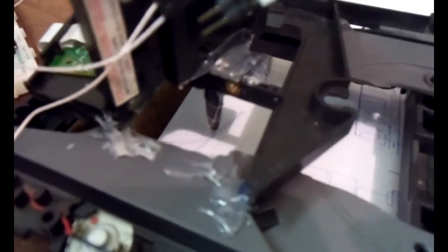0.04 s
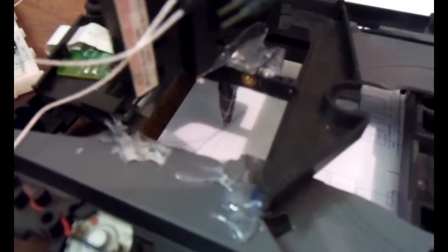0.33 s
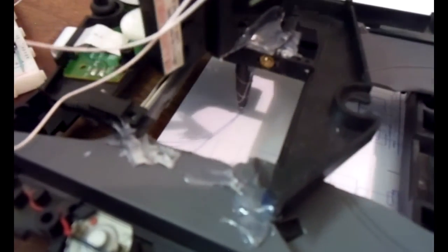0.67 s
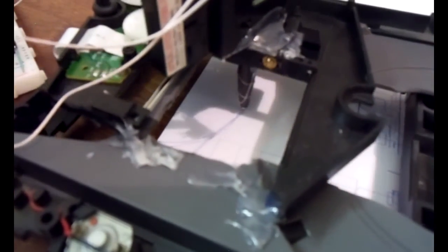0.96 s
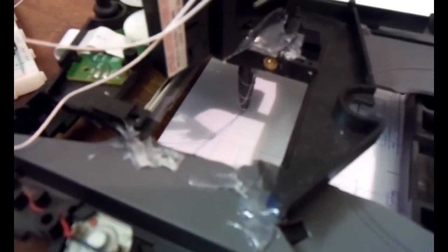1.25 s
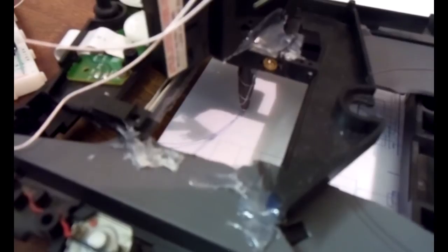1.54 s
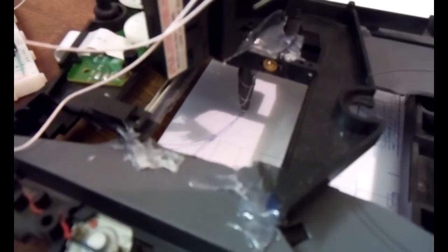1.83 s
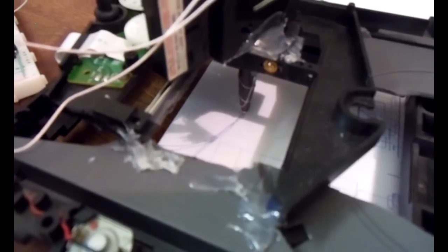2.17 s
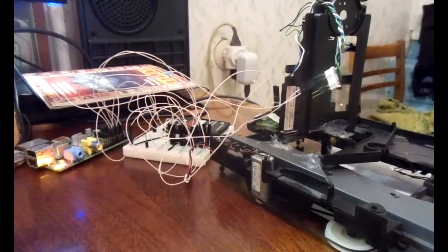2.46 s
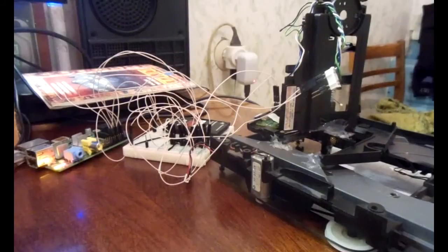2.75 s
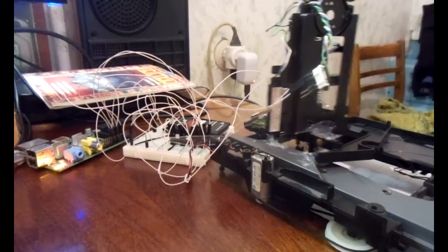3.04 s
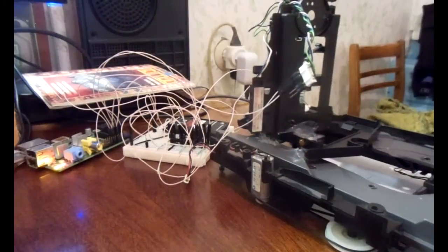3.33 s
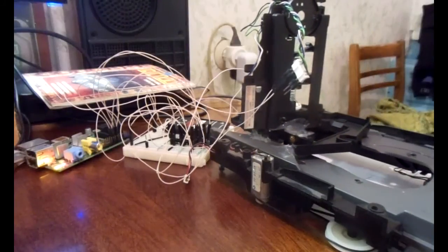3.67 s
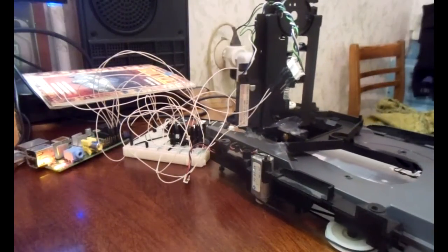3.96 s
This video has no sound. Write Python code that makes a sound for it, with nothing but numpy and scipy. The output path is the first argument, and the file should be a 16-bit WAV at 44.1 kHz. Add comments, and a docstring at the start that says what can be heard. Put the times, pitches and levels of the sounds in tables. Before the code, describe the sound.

A pen plotter's small motor drags its carriage in quick rubbing strokes with knocks and ticks, fading by 1.4 seconds. A plastic click comes at 2 seconds, then a brief silence. A computer fan's hum and a faint high whine return slightly louder. From 3 seconds a slide scrapes with sharp plastic clacks, loudest around 3.2 to 3.3, and a thin, wavering hiss continues until 4 seconds.

```python
"""A homemade pen plotter's small motor drags its carriage in quick, short strokes.
The strokes rub, knock and tick, then die away. After a brief silence, heard from another spot,
a motor runs a slide into its stop with a few plastic clacks and whirrs on with a thin, wavering hiss.
Behind the plotter, its electronics whine and a computer fan hums."""
import sys
import numpy as np
from scipy import signal
from scipy.fft import rfft, irfft
from scipy.io import wavfile

SR = 44100
rng = np.random.default_rng(int(sys.argv[2]) if len(sys.argv) > 2 else 0)


def to_wav(sig):
    """Store sig (one row per channel, or 1-D mono) as 16-bit WAV at the path in sys.argv[1].

    Samples outside -1..1 are clipped; the rate is SR.
    """
    pcm = np.clip(np.atleast_2d(sig), -1, 1) * 32767
    pcm = np.round(pcm).astype(np.int16)
    wavfile.write(sys.argv[1], SR, pcm.T)  # frames by channels


N = 176400
T = np.arange(N) / SR
PAUSE_S, RESUME_S = 2.108, 2.26  # start and end of the silence
TOP_HZ = 14300  # the sound fades out above this pitch


def carriage():
    """Each motor step drags the carriage a little, so it rubs; loose frame parts buzz underneath."""
    # one stroke per motor step (start [s], length [s], level [dB])
    strokes = [(-.015, 0.03, -49), (0.025, 0.047, -48), (0.086, 0.043, -50), (0.149, 0.048, -48),
               (0.203, 0.048, -47.5), (0.267, 0.046, -48), (0.314, 0.051, -50), (0.368, 0.046, -49),
               (0.44, 0.02, -45), (0.48, 0.035, -46), (0.524, 0.031, -50), (0.597, 0.016, -41),
               (0.643, 0.027, -52)]
    # tone of the rubbing (frequency [Hz], level [dB])
    rub_tone = [(300, -12), (1600, 1), (2600, 1), (4900, -1), (6300, -7), (7050, 9), (7700, -4), (9600, -2),
                (12300, -3), (12950, 4), (13400, 0), (14200, 1)]
    # how loud the loose parts buzz (time [s], level [dB])
    buzz_levels = [(0, -53.5), (.27, -61.5), (.36, -50), (.56, -52), (.95, -57.5), (1.4, -65.5)]
    # tone of the buzz (frequency [Hz], level [dB])
    buzz_tone = [(150, -10.5), (400, 11.5), (2000, -2), (4000, -2), (7000, -11), (14000, -6.5)]
    fade_s = .007
    moving = sum(amp(db) * np.clip(np.minimum(T - start, start + length - T) / fade_s, 0, 1)
                 for start, length, db in strokes)
    rub = colour(friction(per_s=12000, spread_db=-0.5) * moving, rub_tone)
    buzz = colour(friction(per_s=2200, spread_db=-2.5) * level(buzz_levels), buzz_tone)
    return rub + buzz


def knocks_and_ticks():
    """The carriage lurches with a thud, motor steps knock the frame and slack gears tick as they catch."""
    # heavy lurches (time [s], level [dB])
    thuds = [(.037, -40.5), (.159, -41), (.212, -42), (.3327, -35.5), (.3854, -34), (.4387, -37),
             (.5461, -34)]
    # lighter knocks of the motor steps (time [s], level [dB])
    knocks = [(0.065, -42.5), (0.125, -43), (0.184, -38), (0.355, -43.5), (0.408, -45), (0.4917, -46),
              (0.561, -35.5), (0.566, -43), (0.6217, -39), (0.6885, -41), (.711, -49), (.812, -46),
              (0.8597, -43.5), (0.9033, -42), (0.9682, -46.5), (1.0272, -44.5), (1.081, -45),
              (1.1331, -44.5), (1.1799, -44.5), (1.2273, -45), (1.3028, -45), (1.312, -49.5)]
    # tone of the knocked frame (frequency [Hz], level [dB])
    knock_tone = [(200, -12), (700, -6), (1150, -10), (1750, 2), (2000, 0), (2400, 4), (3300, -7),
                  (3900, -4), (4700, -3), (5900, -16), (7150, -7), (8300, -22), (14000, -26)]
    # sharp gear ticks (time [s], level [dB])
    ticks = [(0.0074, -35.5), (0.249, -37.5), (0.3, -39), (0.319, -37), (0.354, -41), (0.4077, -38.5),
             (0.4627, -36), (0.4905, -39.5), (0.5623, -28), (0.619, -33.5), (0.623, -32.5), (0.667, -43),
             (0.7196, -41.5), (0.7713, -37.5), (0.82, -40), (0.8702, -40), (0.929, -39), (0.978, -41),
             (1.034, -44.5), (1.089, -47), (1.3026, -44), (1.961, -46.5)]
    # tone of a tick (frequency [Hz], level [dB])
    tick_tone = [(300, -28), (1200, -9.5), (2400, 1), (4600, 4), (7800, 1.5), (9500, 2), (10600, -0.5),
                 (11600, 8), (12600, -0.5), (14000, 2)]
    out = np.zeros((2, N))
    for start, db in thuds:
        thud = blow(attack_s=.0012, decay_s=.0045, tail_db=-25, tail_s=.03)
        add(out, start, amp(db) * colour(thud, knock_tone, ring=(800, 450, 8)))  # the frame's low ring
    for start, db in knocks:
        knock = blow(attack_s=.0012, decay_s=.0025, tail_db=-24, tail_s=.025)
        add(out, start, amp(db) * colour(knock, knock_tone))
    for start, db in ticks:
        tick = blow(attack_s=.0021, decay_s=.00096, tail_db=-17.5, tail_s=.0035)
        add(out, start, amp(db) * colour(tick, tick_tone))
    return out


def slide():
    """The running slide scrapes, while its hiss and a high singing sound swell in turn."""
    # how loud the slide scrapes (time [s], level [dB])
    scrape_levels = [(2.985, -71), (3.01, -44.5), (3.06, -47), (3.12, -41), (3.185, -40), (3.275, -47),
                     (3.3, -32.5), (3.335, -38), (3.37, -52.5), (3.45, -54), (4, -53)]
    # tone of the scrape (frequency [Hz], level [dB])
    scrape_tone = [(300, -0.5), (1000, -6.5), (2300, -0.5), (3100, -1), (3700, 4), (4300, -5.5),
                   (5000, 1.5), (5600, -5.5), (9300, -10.5), (11000, -5), (14000, -1.5)]
    # how loud it hisses (time [s], level [dB])
    hiss_levels = [(3, -55), (3.1, -42.5), (3.17, -37.5), (3.26, -40), (3.33, -41), (3.48, -43.5),
                   (3.8, -46.5), (4, -49.5)]
    # tone of the hiss (frequency [Hz], level [dB])
    hiss_tone = [(5000, -32.5), (8600, -10), (9250, -6), (9800, -8), (10350, -2), (11000, -6), (11900, -3),
                 (12300, -7), (12800, 2), (13400, 2.5), (14300, -10)]
    # how loud it sings near 7.5 kHz (time [s], level [dB])
    sing_levels = [(3.05, -49), (3.3, -53.5), (4, -53.5)]
    # tone of the singing (frequency [Hz], level [dB])
    sing_tone = [(5000, -45), (6300, -7), (6900, 7), (7350, -4), (7750, 5.5), (8300, -30), (10000, -54.5)]
    period_s, peak_s = .222, 3.58
    swing = np.cos(2 * np.pi * (T - peak_s) / period_s)
    scrape = friction(per_s=12000, spread_db=4.5) * level(scrape_levels)
    hiss = friction(per_s=13000, spread_db=3) * level(hiss_levels) * amp(2.5 * swing)
    sing = rng.standard_normal((2, N)) * level(sing_levels) * amp(-1.5 * swing)
    return colour(scrape, scrape_tone) + colour(hiss, hiss_tone) + colour(sing, sing_tone)


def clacks():
    """Plastic parts catch and strike their stops, each with its own ring and low thud."""
    # hits (time [s], level [dB], decay [s], ring pitch [Hz], ring width [Hz], ring [dB], thud [dB])
    hits = [(2.0065, -27, 0.0022, 600, 300, 12.5, 4), (3.003, -37, 0.0047, 2640, 1500, 6, 3.5),
            (3.023, -29, 0.0024, 8200, 900, 16, 14), (3.047, -32.5, 0.0029, 8800, 1500, 15, 7),
            (3.088, -32.5, .002, 9200, 1200, 13, 0), (3.155, -31, .002, 11000, 1500, 2, -5),
            (3.1747, -12, 0.00089, 9550, 710, 13, -6), (3.1763, -24.5, 0.0017, 2880, 1000, 9, -10),
            (3.282, -14.5, 0.0025, 5100, 2500, 5, 3.5), (3.291, -28.5, 0.0056, 2300, 1800, 14, 9),
            (3.317, -21, 0.0034, 1890, 1090, 24.5, 18)]
    # tone of struck plastic (frequency [Hz], level [dB])
    plastic_tone = [(150, -22.5), (600, -6), (900, -10), (1600, -5), (2400, -1), (3000, -2), (3700, 2),
                    (4400, -1), (5100, 0.5), (6800, -3.5), (9400, 0), (11000, -3), (14000, -5.5)]
    # how alike left and right are (frequency [Hz], likeness [0-1])
    likeness = [(9000, .6)]
    thud_below_hz, crack_s = 1330, .0002
    out = np.zeros((2, N))
    for start, db, decay_s, ring_hz, width_hz, ring_db, thud_db in hits:
        tone = [(hz, band_db + thud_db / (1 + (hz / thud_below_hz) ** 4)) for hz, band_db in plastic_tone]
        hit = blow(attack_s=.00012, decay_s=decay_s, tail_db=-27.5, tail_s=.052)
        hit[0, round(crack_s * SR)] = amp(10)  # the first contact stands out from the chatter
        add(out, start, amp(db) * colour(hit, tone, likeness, ring=(ring_hz, width_hz, ring_db)))
    return out


def frame(sound):
    """The hollow plastic frame adds a brief ring made of many close pitches."""
    decay_s = .009
    t = np.arange(2 ** 11) / SR
    noise = rng.standard_normal((3, len(t))) * np.exp(-t / decay_s)
    echoes = noise[:2] * 0.45 + noise[2]  # mostly shared by left and right
    ring = amp(-7) * echoes / np.linalg.norm(echoes, axis=1, keepdims=True)
    ring[:, 0] = 1  # the direct sound
    return signal.oaconvolve(sound, ring / np.linalg.norm(ring[0]), axes=1)[:, :N]


def whine():
    """The electronics give off a thin, very high whine, louder after the silence."""
    pitch_hz = 13190 + 12 * drift(rate_hz=15)
    return sine(pitch_hz, db=np.where(T < RESUME_S, -75, -68.5))


def fan():
    """The fan's air rushes under wavering fan and mains hums, all a little louder after the silence."""
    # tone of the air at the first spot (frequency [Hz], level [dB])
    first_tone = [(20, -1.5), (70, -7), (95, -10), (135, -1.5), (190, -14), (290, -6), (400, -11),
                  (900, -20), (1500, -24.5), (3860, -33), (14000, -35)]
    # tone of the air at the second spot (frequency [Hz], level [dB])
    second_tone = [(20, -7), (50, -5.5), (190, -8.5), (300, -5), (455, -8), (650, -14), (1250, -19),
                   (1800, -22), (4000, -27), (14000, -30.5)]
    # how alike left and right are (frequency [Hz], likeness [0-1])
    likeness = [(50, 0.77), (300, 0.91), (1000, 0.69), (3000, 0.17), (8000, 0), (14000, 0)]
    # hums (pitch [Hz], level at first spot [dB], level at second spot [dB], pitch wander [Hz])
    hums = [(77.5, -66.5, -58, 1.15), (286, -50.5, -48, 0.69), (330.4, -63, -56.5, 1.48)]
    at_first_spot = T < RESUME_S
    air = [amp(db) * evened(colour(rng.standard_normal((2, N)), tone, likeness, lean_right=False))
           for tone, db in [(first_tone, -50), (second_tone, -46.5)]]
    out = np.where(at_first_spot, *air) * amp(1.46 * drift(rate_hz=5.7))
    for hz, first_db, second_db, wander_hz in hums:
        pitch_hz = hz + wander_hz * drift(rate_hz=16.7)
        db = np.where(at_first_spot, first_db, second_db) + 0.76 * drift(rate_hz=8.5)
        out += sine(pitch_hz, db)
    return out


def friction(per_s, spread_db):
    """Rubbing surfaces make many tiny slips of uneven size."""
    size = amp(spread_db * np.minimum(rng.exponential(1, N), 4))
    slips = rng.random(N) < per_s / SR
    return evened(size * slips * rng.standard_normal((2, N)))


def blow(attack_s, decay_s, tail_db, tail_s):
    """A hit builds up, then dies quickly, leaving a weaker tail from the table and room."""
    t = np.arange(2 ** 13) / SR
    rise = np.sin(np.pi / 2 * np.minimum(t / attack_s, 1)) ** 2
    fall = np.exp(-np.maximum(t - attack_s, 0) / decay_s)
    tail = amp(tail_db) * np.exp(-t / tail_s)
    return rise * (fall + tail) * rng.choice([-1., 1.], (2, len(t)))


def colour(noises, tone, likeness=None, lean_right=True, ring=None):
    """Gives two unrelated noises an object's tone and blends them into left and right."""
    # how alike the machine sounds left and right (frequency [Hz], likeness [0-1])
    machine_likeness = [(1500, .9), (4000, .7), (8000, .6), (14000, .35)]
    # its highest sounds lean to the right (frequency [Hz], left minus right [dB])
    lean = [(2000, -0.5), (8000, 0), (13000, -4)]
    size = noises.shape[1]
    hz = np.fft.rfftfreq(size, 1 / SR)
    db = look_up(tone, hz)
    if ring:
        ring_hz, width_hz, ring_db = ring
        db = db + ring_db / (1 + ((hz - ring_hz) / width_hz) ** 2)
    log_gain = np.log(amp(db))
    mirrored = np.r_[log_gain, log_gain[-2:0:-1]]
    body = np.exp(np.conj(signal.hilbert(mirrored)))[:len(hz)]  # rings after a hit, not before it
    body *= hz < TOP_HZ + 600
    body /= np.sqrt(2 * np.mean(abs(body) ** 2))
    alike = np.clip(look_up(likeness or machine_likeness, hz), -1, 1)
    middle, side = rfft(noises) * np.sqrt([1 + alike, 1 - alike]) * body
    tilt = amp(look_up(lean, hz) / 2) if lean_right else 1
    return irfft([(middle + side) * tilt, (middle - side) / tilt], size)


def sine(pitch_hz, db):
    """A pure tone that follows a changing pitch and level."""
    turns = np.cumsum(pitch_hz) / SR
    return np.sqrt(2) * amp(db) * np.sin(2 * np.pi * turns)


def drift(rate_hz):
    """A slow random wobble with a typical size of 1."""
    hz = np.fft.rfftfreq(N, 1 / SR)
    return evened(irfft(rfft(rng.standard_normal(N)) * np.exp(-(hz / rate_hz) ** 2), N))


def amp(db):
    """Turns decibels into a number to multiply by."""
    return 10 ** (np.asarray(db) / 20)


def evened(sound):
    """Scales a sound to an average strength (rms) of 1."""
    return sound / np.sqrt(np.mean(sound ** 2) + 1e-20)


def look_up(points, hz):
    """Reads between a table's frequencies, with octaves evenly spaced."""
    frequencies, values = np.transpose(points)
    return np.interp(np.log(hz + 1), np.log(abs(frequencies) + 1), values)


def level(points):
    """Joins (time, level) points into a volume curve, silent before the first one."""
    times, db = np.transpose(points)
    return amp(np.interp(T, times, db, left=-120))


def add(mix, start_s, sound):
    """Mixes a sound in at the given time."""
    part = mix[:, max(round(start_s * SR), 0):][:, :sound.shape[1]]
    part += sound[:, :part.shape[1]]


def scene():
    """The plotter's moving parts ring through its frame, over the fan and the whine."""
    return fan() + whine() + frame(carriage() + knocks_and_ticks() + slide()) + clacks()


def record(dry):
    """Adds the silence and a quieter instant after it, then removes the very highest pitches."""
    volume = np.select([T < PAUSE_S, T < RESUME_S, T < RESUME_S + .02], [1, 0, amp(-9)], 1)
    low_pass = signal.firwin(301, TOP_HZ, window=("kaiser", 7), fs=SR)
    return signal.oaconvolve(dry * volume, low_pass[None], "same")


dry = scene()
out = record(dry)
to_wav(out)
```